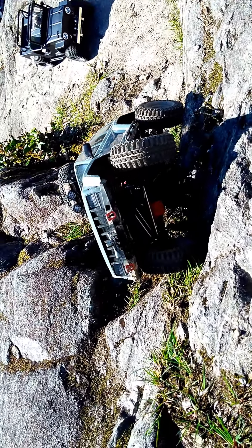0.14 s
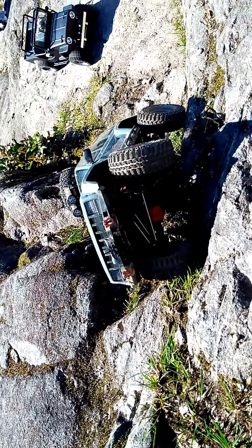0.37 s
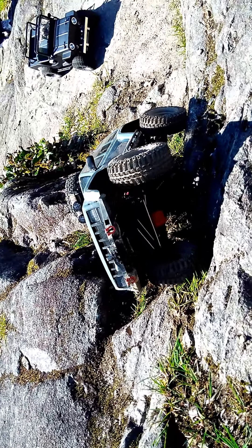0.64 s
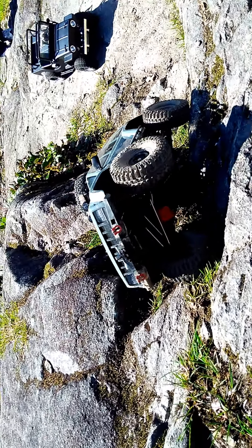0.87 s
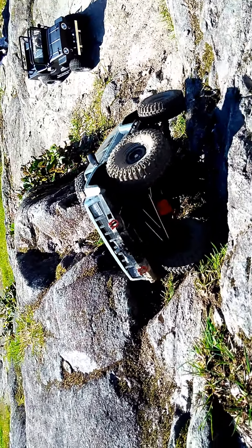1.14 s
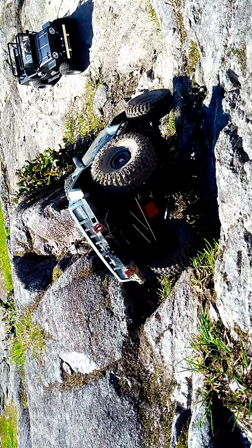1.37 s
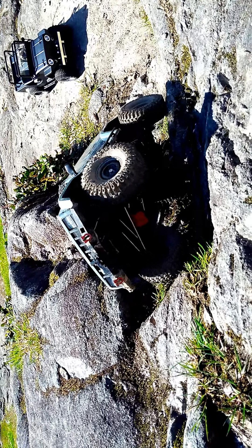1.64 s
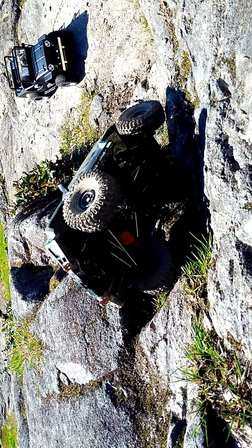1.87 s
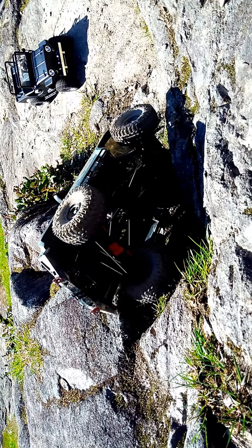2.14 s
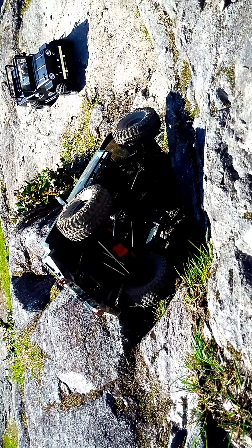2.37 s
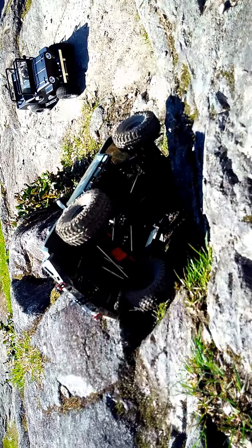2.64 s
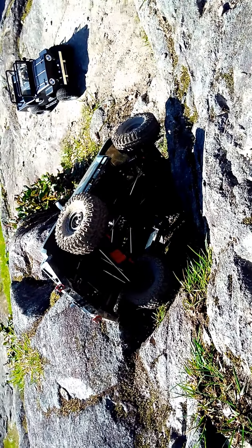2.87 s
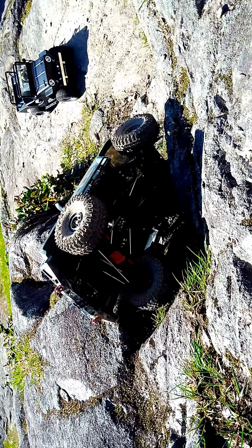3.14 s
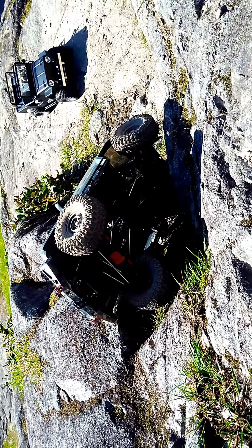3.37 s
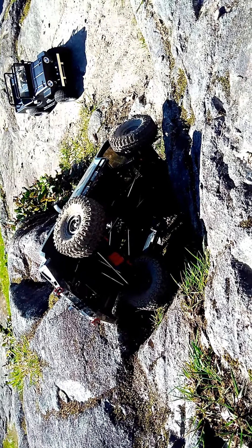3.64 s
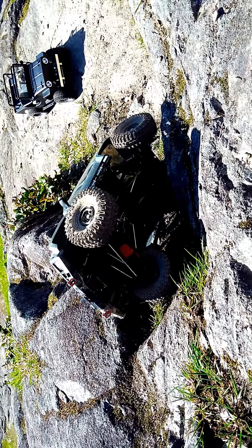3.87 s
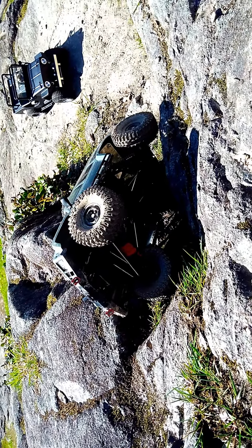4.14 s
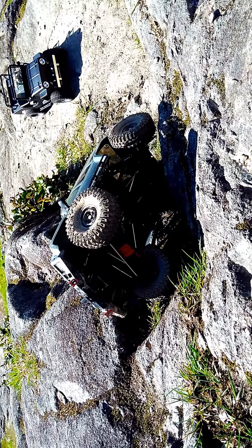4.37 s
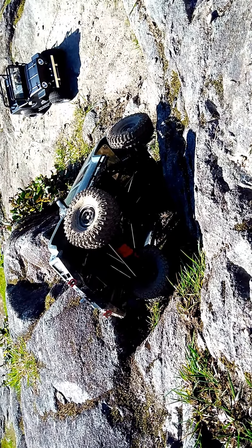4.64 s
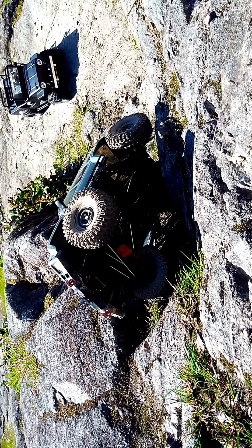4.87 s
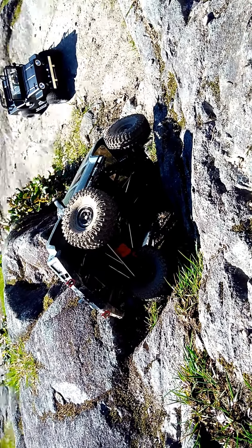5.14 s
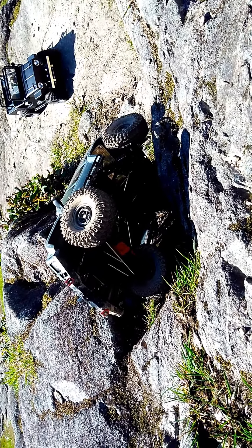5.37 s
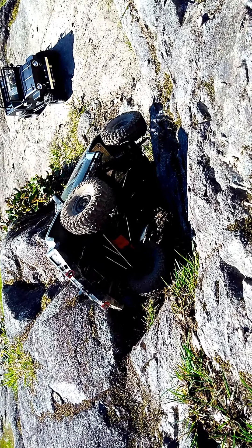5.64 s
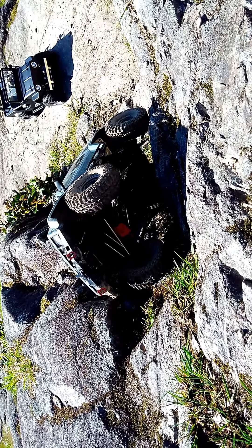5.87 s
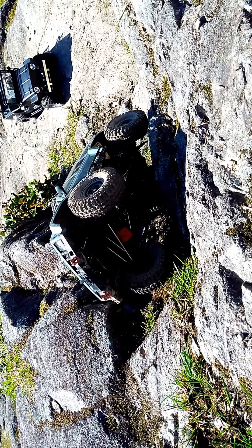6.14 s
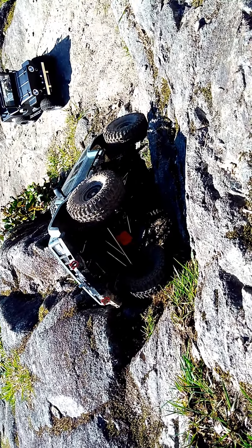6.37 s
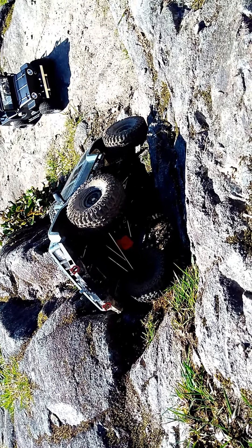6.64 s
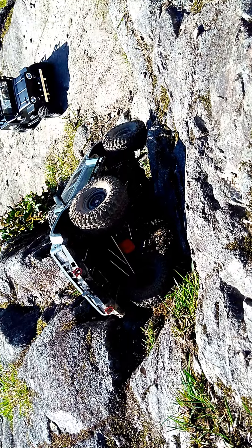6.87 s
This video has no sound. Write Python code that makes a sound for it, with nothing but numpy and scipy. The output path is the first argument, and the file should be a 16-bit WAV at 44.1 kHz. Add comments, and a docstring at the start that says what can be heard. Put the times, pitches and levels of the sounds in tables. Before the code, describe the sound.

Close up outdoors, a small toy truck whines with wavering plastic gears for about two seconds, hissing and knocking rock near the end. A quieter stretch follows with faint steering hum and a small rising tone. Then come two clusters of hard hollow knocks with short tyre grinding, and weak slow gear ticking between and after. Light wind bumps the stereo microphone; distant insects buzz faintly.

```python
"""Toy truck crawling over rocks

A toy truck's small gears whine with a wavering speed as a sum of partials, or as single tooth contacts at a crawl.
The tyres grind as random grains and stone knocks ring the chassis, both through a bank of plastic resonances.
Steering hums and hisses, and a faint tone glides up. A light breeze thumps on the microphone ports as low noise,
and insects buzz far off as a throbbing band of noise over open air and a far hum.
Two close microphone capsules are subtracted from each other to make the stereo pair."""
import sys
import numpy as np
from scipy import signal
from scipy.fft import rfft, irfft
from scipy.io import wavfile
from scipy.ndimage import uniform_filter1d

SR = 44100
rng = np.random.default_rng(int(sys.argv[2]) if len(sys.argv) > 2 else 0)


def master_out(mix):
    """Clip the mix to full scale and print it as 16-bit PCM to the path in sys.argv[1]."""
    frames = np.transpose(np.atleast_2d(mix))
    ceiling = np.clip(frames, -1, 1)
    pcm = np.round(ceiling * 32767).astype(np.int16)
    wavfile.write(sys.argv[1], SR, pcm)


def gain_from_db(level_db):
    """Turn a decibel level (scalar or array-like) into a linear amplitude factor."""
    decades = np.asarray(level_db, float) / 20
    return 10 ** decades


N = 308700
T = np.arange(N) / SR
HZ = np.maximum(np.fft.rfftfreq(N, 1 / SR), 1)


def rms_one(x):
    """Scales a sound to an rms (average strength) of 1."""
    return x / np.sqrt(np.mean(x ** 2) + 1e-20)


def in_time(rows, outside=None):
    """Draws straight lines between the rows of a table, one curve per column after the time."""
    s, *columns = np.transpose(rows)
    return [np.interp(T, s, column, outside, outside) for column in columns]


def at_hz(points, axis=1):
    """Reads one column of a spectrum table at every FFT frequency."""
    points = np.array(points)
    return np.interp(np.log(HZ), np.log(points[:, 0]), points[:, axis])


def noise():
    """Fresh white noise: equal strength at all pitches."""
    return rng.standard_normal(N)


def coloured(points):
    """Fresh noise shaped to a spectrum table, rms 1."""
    return rms_one(irfft(rfft(noise()) * gain_from_db(at_hz(points)), N))


def drift(rate_hz):
    """A slow random wander with rms 1, from smoothed noise drawn at every 20th sample."""
    r = np.exp(-40 * np.pi * rate_hz / SR)
    draws = rng.standard_normal(N // 20 + 2202)
    slow = signal.lfilter([1], [1, -2 * r, r * r], draws)[2200:]   # skip the filter's start
    return np.interp(np.arange(N) / 20, np.arange(len(slow)), rms_one(slow))


def resonate(x, hz, width_hz):
    """Lets one pitch ring: a two-pole resonance with gain close to 1 at its top."""
    r = np.exp(-np.pi * width_hz / SR)
    top = [(1 - r * r) / 2, 0, (r * r - 1) / 2]
    bottom = [1, -2 * r * np.cos(2 * np.pi * hz / SR), r * r]
    return signal.lfilter(top, bottom, x + 1e-18)


def soft(x, hz):
    """Softens a contact by low-passing its click."""
    r = np.exp(-2 * np.pi * hz / SR)
    return signal.lfilter([1 - r], [1, -r], x)


def evened(x, seconds):
    """Divides out the running level, so that another curve can set the loudness."""
    return x / np.sqrt(uniform_filter1d(x ** 2, int(seconds * SR)) + 1e-9)


def clicks(rows, db):
    """One single-sample push per event."""
    out = np.zeros(N)
    out[(np.array(rows)[:, 0] * SR).astype(int)] = gain_from_db(db)
    return out


def dying(x, t60):
    """Turns each push into a level that falls by 60 dB in t60 seconds."""
    return signal.lfilter([1], [1, -gain_from_db(-60 / (t60 * SR))], x)


def grains(per_s, spread_db):
    """Random clicks of uneven size and either sign, rms 1."""
    sizes = gain_from_db(spread_db * np.minimum(rng.exponential(1, N), 5)) * rng.choice([-1, 1], N)
    return rms_one(sizes * (rng.random(N) < per_s / SR))


def swells(rows, db, rise_s, t60):
    """Loudness curve in which each event rises, holds for its length and dies away."""
    out = np.zeros(N)
    for (start_s, length_s, *_), level_db in zip(rows, db):
        heard = slice(int(start_s * SR), int((start_s + rise_s + length_s + 2 * t60) * SR))
        t = T[heard] - start_s
        fall_db = 60 * np.maximum(t - rise_s - length_s, 0) / t60
        out[heard] += gain_from_db(level_db - fall_db) * np.clip(t / rise_s, 0, 1)
    return out


# resonances of the plastic chassis: pitch_hz, width_hz, level_db
CHASSIS_MODES = [(262.2, 37, 3), (482, 124, 2), (687.5, 148, 4.5), (995, 144, 5), (1303, 254, 2),
                 (1680, 434, 1), (1885, 595, 0), (2310, 780, -4), (3160, 160, -4), (3590, 770, -20),
                 (4960, 280, -42)]


def chassis(x, narrow=1):
    """Shakes the plastic chassis: all its resonances ring side by side, with alternating signs."""
    return sum((-1) ** k * gain_from_db(db) * resonate(x, hz, width * narrow)
               for k, (hz, width, db) in enumerate(CHASSIS_MODES))


# speed of the gears, before it trembles: time_s, contacts_per_s
GEAR_SPEED = [(0.0, 293), (0.021, 300), (0.042, 362), (0.056, 335), (0.087, 313), (0.114, 338), (0.15, 343),
              (0.207, 296), (0.245, 290), (0.278, 346), (0.293, 360), (0.344, 338), (0.359, 255),
              (0.407, 297), (0.464, 229), (0.506, 287), (0.536, 253), (0.564, 212), (0.58, 212),
              (0.596, 224), (0.632, 209), (0.656, 218), (0.694, 232), (0.727, 240), (0.742, 207),
              (0.776, 208), (0.798, 228), (0.83, 236), (0.855, 232), (0.89, 304), (0.914, 283),
              (0.938, 298), (0.961, 262), (1.0, 306), (1.022, 299), (1.07, 295), (1.1, 304), (1.112, 297),
              (1.148, 307), (1.171, 287), (1.195, 312), (1.224, 300), (1.248, 321), (1.284, 290),
              (1.306, 326), (1.344, 294), (1.366, 340), (1.39, 291), (1.412, 317), (1.445, 250),
              (1.473, 257), (1.503, 237), (1.54, 277), (1.58, 250), (1.62, 296), (1.645, 289), (1.668, 330),
              (1.708, 252), (1.745, 280), (1.8, 268), (1.838, 290), (1.91, 236), (1.967, 292), (1.987, 356),
              (2.008, 343), (2.026, 376), (2.045, 358), (2.07, 348), (2.089, 330), (2.125, 230), (2.2, 265),
              (3.68, 103), (3.8, 138), (3.94, 294), (4.1, 192), (4.97, 77), (5.015, 77), (5.03, 90),
              (5.07, 92), (5.11, 106), (5.165, 96), (5.168, 55), (5.18, 55), (5.184, 90), (5.255, 90),
              (5.262, 70), (5.33, 68), (5.42, 74), (6.5, 100), (6.55, 100), (6.57, 118), (6.69, 121),
              (6.75, 100), (6.85, 72)]
# moments when the gears take up their play on a tooth: start_s
CRAWL_STARTS = [0, 4.977, 6.505]


def gear_motion():
    """Adds up the gear speed into tooth contacts; a click marks each one."""
    mesh_hz, = in_time(GEAR_SPEED)
    fast = np.clip((mesh_hz - 150) / 50, 0, 1)   # 0 at a crawl, 1 at speed
    turns = np.cumsum(mesh_hz * (1 + .014 * drift(45))) / SR   # the speed trembles
    starts = (np.array(CRAWL_STARTS) * SR).astype(int)
    begun = starts[np.searchsorted(starts, np.arange(N), "right") - 1]
    contacts = np.diff(np.floor(turns - turns[begun]), prepend=0) > 0
    return fast, turns, contacts * gain_from_db(1.3 * drift(200))


# effort of the drive at the chassis, one table per pull: time_s, level_db
PULL_EFFORTS = [
    [(0.0, -29), (0.03, -26.5), (0.08, -28), (0.12, -23), (0.16, -26), (0.208, -31.5), (0.26, -29.5),
     (0.28, -20.5), (0.332, -23.5), (0.352, -29.5), (0.452, -34), (0.498, -28), (0.608, -37.5), (0.77, -33),
     (1.014, -27.5), (1.196, -28), (1.232, -29.5), (1.294, -27), (1.33, -24.5), (1.358, -23.5),
     (1.492, -34.5), (1.534, -28.5), (1.602, -31), (1.638, -27), (1.752, -29), (1.814, -29), (1.862, -43.5),
     (1.872, -37), (1.91, -37.5), (1.94, -28.5), (1.95, -31), (1.964, -25), (1.995, -19), (2.013, -23.5),
     (2.025, -16.5), (2.045, -25), (2.065, -20), (2.09, -27), (2.13, -31), (2.2, -39.5), (2.208, -29),
     (2.225, -29.5), (2.248, -42), (2.322, -67)],
    [(3.695, -61), (3.704, -47.5), (3.792, -42.5), (3.816, -35), (3.885, -37), (3.9, -28), (3.928, -27),
     (3.96, -29), (3.975, -33), (3.998, -33.5), (4.04, -43), (4.08, -55), (4.146, -66)],
    [(4.215, -63), (4.226, -45), (4.256, -47), (4.31, -50.5), (4.35, -59), (4.356, -45), (4.419, -55),
     (4.489, -86)],
    [(4.98, -63), (4.992, -55), (5.005, -46), (5.064, -49.5), (5.17, -46.5), (5.2, -48), (5.25, -45.5),
     (5.322, -40), (5.35, -71)],
    [(5.33, -67), (5.35, -47), (5.38, -56), (5.404, -48), (5.418, -61), (5.446, -51), (5.484, -68)],
    [(5.561, -41), (5.567, -27.5), (5.614, -33.5), (5.65, -35.5), (5.664, -40), (5.7, -40.5), (5.74, -37),
     (5.758, -32.5), (5.884, -41), (5.98, -53), (6.098, -56.5), (6.178, -82)],
    [(6.512, -62), (6.519, -50), (6.574, -43), (6.594, -46.5), (6.69, -43), (6.73, -70)],
    [(6.69, -52), (6.72, -47), (6.79, -53), (6.805, -42.5), (6.82, -46.5), (6.83, -57), (6.88, -70)],
]
# share of tyre grind in each pull, before judder and limits: share_0_to_1
PULL_GRIND = [0.02, 0.75, 0.8, 0.18, 0.8, 0.75, 0.25, 0.8]
# at speed the tyres judder under load, then break loose: time_s, added_grind_0_to_1
TYRE_JUDDER = [(0.0, 0), (0.34, 0), (0.37, .15), (0.54, .12), (0.66, .06), (0.7, .3), (0.74, 0),
               (0.85, .05), (1.0, .1), (1.38, .12), (1.44, .5), (1.54, .25), (1.8, .45), (1.83, .85),
               (1.94, .8), (1.97, .05), (2.07, .15), (2.1, 1)]


def load(fast):
    """Adds the pulls into one effort, and works out how much of it goes into grind."""
    efforts = [gain_from_db(in_time(pull, outside=-120)[0]) for pull in PULL_EFFORTS]
    effort = sum(efforts)
    rough = sum(share * part for share, part in zip(PULL_GRIND, efforts)) / effort
    rough = rough + fast * in_time(TYRE_JUDDER)[0]
    return effort, np.clip(.11 + .87 * rough, 0, 1)


# loudness of multiples 1 to 14 of the contact rate, before sharpness and drift: level_db
PARTIAL_LEVELS = [-1, 0.5, 0.5, 2.5, -3, -5, -5.5, -3.5, -17, -4, -7.5, -4.5, -5, -9]
# lightly loaded teeth touch more sharply; the tilt turns about the third multiple and
# stops growing at the fifth: time_s, tilt_db_per_multiple
TOOTH_SHARPNESS = [(0.0, 1.5), (0.35, 0), (0.45, 1), (0.56, 1.5), (0.85, 2.5), (0.95, -0.5), (1.4, 0.5),
                   (1.5, 1.5), (1.8, 2.5), (1.97, 0), (2.1, 1)]
# strain of a crawl, which rings the gearbox higher: time_s, level_db
CRAWL_STRAIN = [(5.0, -5), (5.05, -22), (5.16, -17), (5.19, -2), (5.34, 12), (5.4, -2), (6.5, -19),
                (6.6, -16), (6.68, 11), (6.72, -5)]


def gear_whine(fast, turns, teeth):
    """Rings the chassis with single contacts at a crawl, which merge into swelling partials at speed."""
    tilt_db, = in_time(TOOTH_SHARPNESS)
    partials = 0
    for k, db in enumerate(PARTIAL_LEVELS, 1):
        level = gain_from_db(3.8 * drift(30.0) + db + tilt_db * (min(k, 5) - 3))
        partials = partials + level * np.cos(2 * np.pi * (k * turns + rng.random()))
    # slow contacts are soft and reach only the gearbox band
    crawl = resonate(resonate(teeth, 730, 410), 770, 620)
    strained = resonate(teeth, 1050, 240) + gain_from_db(-15.0) * resonate(teeth, 2060, 500)
    crawl = crawl + gain_from_db(in_time(CRAWL_STRAIN)[0]) * strained
    at_speed = evened(chassis(partials), seconds=0.057)
    at_crawl = evened(chassis(crawl, narrow=0.62), seconds=0.036)
    return fast * at_speed + (1 - fast) * at_crawl


def grind():
    """Tyres and gears grind: many soft, uneven grains shake the chassis."""
    return evened(chassis(soft(grains(900, spread_db=1.0), 1260)), seconds=0.073)


def whistle():
    """A thin steady whistle: noise through one very narrow resonance."""
    return rms_one(resonate(noise(), 3900, 32))


# the body lurches on its springs: start_s, length_s, level_db
BODY_LURCHES = [(0.039, 0.011, -39), (0.18, 0.0067, -57), (0.434, 0.013, -39.5), (0.982, 0.02, -49),
                (1.542, 0.015, -52), (1.736, 0.084, -36), (1.954, 0.028, -61), (2.062, 0.02, -27.5),
                (2.211, 0.024, -34.5), (2.952, 0.086, -51.5), (3.813, 0.029, -29.5), (3.882, 0.11, -29.5),
                (4.218, 0.042, -44), (4.373, 0.017, -49), (5.555, 0.013, -30.5), (5.638, 0.023, -36.5),
                (6.675, 0.019, -49), (6.797, 0.009, -47.5)]


def shudder(effort):
    """Low resonant noise of the body on its springs, with lurches, effort and a steady floor."""
    level = swells(BODY_LURCHES, np.array(BODY_LURCHES)[:, 2], rise_s=0.0059, t60=0.28)
    level = level + gain_from_db(-28 + 6.4 * drift(6.3)) * effort + gain_from_db(-63)
    rumble = resonate(resonate(noise(), 247.5, 61), 166.0, 480)
    return level * evened(rumble, seconds=0.0315)


# shape of the hiss noise: pitch_hz, level_db (per Hz)
HISS_COLOUR = [(1200, -16.5), (2000, 5.5), (3200, 6.5), (4500, 1), (6000, -4.5), (7500, -17.5), (9000, -24),
               (15000, -52)]
# shape of the finest grit and brush sparks: pitch_hz, level_db (per Hz)
FIZZ_COLOUR = [(5000, -6), (7000, -4.5), (9000, 4.5), (12000, 1), (15300, -4), (15700, -37)]
# tyres and skid plate scrape the rock: start_s, length_s, level_db, brightness_db
ROCK_SCRAPES = [(0.267, 0.032, -72, -6), (1.34, 0.014, -51, -27), (1.967, 0.017, -35, -5.5),
                (1.995, 0.018, -35, -40), (2.11, 0.015, -46, -30), (2.134, 0.032, -47, -6),
                (2.245, 0.051, -58, -8), (2.33, 0.14, -74, -15), (3.797, 0.0077, -57, -21),
                (3.923, 0.028, -49, -34), (5.547, 0.016, -45, -5), (5.609, 0.072, -47, -6.5),
                (5.671, 0.042, -56.5, 3), (5.758, 0.082, -53, -5), (6.68, 0.13, -84, 14.5)]
# the steering works: start_s, length_s, hum_db, hiss_db
STEERING = [(2.687, 0.017, -68, -60.5), (2.719, 0.069, -60, -53), (2.791, 0.0072, -58, -53.5),
            (2.833, 0.0062, -56.5, -54.5), (2.86, 0.0084, -51.5, -52.5), (2.944, 0.092, -63.5, -73),
            (3.198, 0.071, -64.5, -80)]
STEERING_RISE_S, STEERING_T60_S = 0.0087, 0.12


def brush_and_grit_hiss(effort, rough, fast, turns):
    """Brushes, grit, scrapes and steering hiss as two noises that pulse with each tooth contact."""
    scrape_db, bright_db = np.array(ROCK_SCRAPES)[:, 2:].T
    scrape = swells(ROCK_SCRAPES, scrape_db, rise_s=0.029, t60=0.14)
    bright_scrape = swells(ROCK_SCRAPES, scrape_db + bright_db, rise_s=0.029, t60=0.14)
    steer = swells(STEERING, np.array(STEERING)[:, 3], STEERING_RISE_S, STEERING_T60_S)
    hiss = gain_from_db(-19.5) * effort * fast + gain_from_db(3 * drift(83)) * scrape + steer + gain_from_db(-67.5)
    fizz = gain_from_db(-25.5) * effort * fast + bright_scrape + gain_from_db(-1.5) * steer
    flicker = gain_from_db(2.0 * drift(54)) * (1 + .7 * (1 - rough) * np.cos(2 * np.pi * turns))
    return [flicker * (hiss * coloured(HISS_COLOUR) + fizz * coloured(FIZZ_COLOUR)) for capsule in range(2)]


def drive():
    """Tooth contacts and the grind of tyres and gears shake the chassis; brushes and grit hiss."""
    fast, turns, teeth = gear_motion()
    effort, rough = load(fast)
    grinding = grind()
    whine = gear_whine(fast, turns, teeth)
    body = effort * (np.sqrt(1 - rough) * whine + np.sqrt(rough) * grinding)
    body = body + gain_from_db(-76.5 + 2.7 * drift(24.0)) * grinding   # a faint rattle throughout
    body = body + gain_from_db(-42) * effort * fast * whistle()
    return body + shudder(effort), brush_and_grit_hiss(effort, rough, fast, turns)


# the chassis strikes stone; pitch is that of the struck part: start_s, level_db, sharpness_db, pitch_hz
STONE_KNOCKS = [(1.873, -20, -33, 1000), (1.948, -19, -41, 1150), (2.207, -24.5, -10, 1022),
                (3.805, -23, -61, 1181), (3.816, -17.5, -23, 800), (3.8917, -9.5, -15, 1000),
                (3.91, -17, -47, 800), (3.937, -18.5, -21, 1100), (3.968, -18, -27, 1100),
                (3.987, -25, -31, 700), (4.153, -38.5, -32, 723.5), (4.224, -23, -56, 560),
                (4.355, -33, -53, 640), (5.179, -32.5, -49, 1050), (5.563, -7, -30, 710),
                (5.582, -14, -41, 800), (5.596, -28, -42, 900), (5.658, -21.5, -25, 719.4),
                (5.704, -18, -33, 1400), (5.747, -20.5, -40, 771), (5.775, -18.5, -30, 543),
                (5.9863, -22.5, -25, 880), (6, -11, -69, 630), (6.0125, -14.5, -15.5, 1050),
                (6.803, -33.5, -46, 993)]
# a hard edge gives one sharp push, centred on its time: time_s, level_db, pitch_hz
HARD_SNAPS = [(1.873, -24, 1100), (1.948, -18, 1170), (2.2082, -21, 1100), (3.8903, -11.5, 1330),
              (4.356, -32.5, 780), (5.18, -30, 1100), (5.5648, -9.5, 930), (5.66, -17.5, 716),
              (5.707, -24, 1290), (5.749, -14.5, 910), (5.987, -24, 865), (6.0137, -3, 1220)]
# ticks of grit: start_s, level_db
GRIT_TICKS = [(0.4126, -39.5), (0.932, -35.5), (2.303, -49), (2.5276, -58), (2.9505, -47.5), (3.221, -54),
              (3.581, -48.5), (3.931, -38), (5.821, -45), (5.9042, -46.5)]


def knocks():
    """A blow snaps, rings the modes nearest the struck part, rattles them and cracks in the treble."""
    level_db, sharp_db, struck_hz = np.array(STONE_KNOCKS)[:, 1:].T
    # dull blows hardly snap
    snap = resonate(clicks(STONE_KNOCKS, level_db + .5 * sharp_db), 1450, 560)
    grit = grains(2500, spread_db=-6.5)
    ring = 0
    for k, (hz, width, db) in enumerate(CHASSIS_MODES):
        octaves_away = np.abs(np.log2(hz / struck_hz))
        blow = clicks(STONE_KNOCKS, level_db + db - 3.6 * octaves_away)
        rattle = dying(blow, 0.088) * grit
        ring = ring + (-1) ** k * resonate(gain_from_db(15.5) * blow + gain_from_db(2) * rattle, hz, 0.74 * width)
    for s, db, hz in HARD_SNAPS:
        near = slice(int(s * SR) - 300, int(s * SR) + 300)
        cycles = hz * (T[near] - s)
        ring[near] += gain_from_db(db) * np.cos(2 * np.pi * cycles) * np.exp(-(cycles / 0.51) ** 2)
    crack = dying(clicks(STONE_KNOCKS, level_db + sharp_db), 0.045)
    tick = dying(clicks(GRIT_TICKS, np.array(GRIT_TICKS)[:, 1]), 0.016)
    hiss, fizz = gain_from_db(4.0) * (crack + tick), 0.039 * crack + 1.23 * tick
    treble = [hiss * coloured(HISS_COLOUR) + fizz * coloured(FIZZ_COLOUR) for capsule in range(2)]
    return gain_from_db(29.5) * snap + ring, treble


# resonances of the steering: pitch_hz, width_hz, level_db
STEERING_MODES = [(640, 82, -4), (1220, 91, -0.5), (1560, 75, -21)]


def steering_hum():
    """The steering hums roughly: random grains ring a few resonances."""
    hum = sum(gain_from_db(db) * rms_one(resonate(grains(3000, spread_db=4.0), hz, width))
              for hz, width, db in STEERING_MODES)
    return swells(STEERING, np.array(STEERING)[:, 2], STEERING_RISE_S, STEERING_T60_S) * hum


def gliding_tone():
    """A faint sine holds with its octave, then glides up."""
    hold_s, glide_start_s, glide_s = .12, 3.09, 0.15
    # the pitch climbs a little longer, while the tone dies away
    hz = 215 + 850 * np.clip(T - glide_start_s, 0, glide_s + 0.036)
    angle = 2 * np.pi * np.cumsum(hz) / SR
    start_s = glide_start_s - hold_s
    tone = swells([(start_s, hold_s + glide_s)], [-52], rise_s=0.03, t60=0.16)
    octave = swells([(start_s, hold_s)], [-59], rise_s=0.02, t60=0.2)
    tone = tone * gain_from_db(2.5 * drift(30)) * np.sin(angle)
    return tone + octave * gain_from_db(2.5 * drift(30)) * np.sin(2 * angle)


# far capsule against near one, for the truck: pitch_hz, level_db, unrelated_share_0_to_1, phase_lag_rad
FAR_CAPSULE = [(107.3, 15, 0, 0.01), (240, -3.5, 0, 0.48), (650, 0.5, 0.1, 0.29), (1200, 4, 0.18, 1.5),
               (1360, 1.5, 0.34, 2), (1840, 7.5, 0.2, 1.95), (2150, -4, 1, 1.75), (2570, -1, 1, 2.9),
               (5900, 2, 0.91, 1.7), (12200, 1, 1, 2.4)]


def to_capsules(x, hiss):
    """The far capsule hears the truck later, shadowed and partly by other paths."""
    scatter = rng.standard_normal(300) * np.exp(-np.arange(300) / 70)
    scattered = signal.fftconvolve(x, scatter / np.linalg.norm(scatter))[:N]
    other = rfft(scattered + hiss[1])
    near = x + hiss[0]
    direct = rfft(near) * np.exp(-1j * at_hz(FAR_CAPSULE, axis=3))
    share = np.clip(at_hz(FAR_CAPSULE, axis=2), 0, 1)
    far = gain_from_db(at_hz(FAR_CAPSULE)) * (np.sqrt(1 - share) * direct + np.sqrt(share) * other)
    return np.array([near, irfft(far, N)])


# strength of the breeze, before its lumps: time_s, level_db
BREEZE_LEVEL = [(0.0, -46.5), (1.3, -60.5), (2.0, -47.5), (4.0, -55), (4.5, -53.5), (5.5, -50),
                (6.0, -48.5), (6.5, -86), (7.0, -44)]
# thumps on the ports, before they are shared between the two: time_s, level_db
PORT_THUMPS = [(2.271, -24), (2.313, -18), (2.455, -19), (2.616, -23), (2.826, -24), (2.973, -17),
               (4.962, -25), (5.141, -19.5), (5.617, -10), (5.675, -24), (5.722, -21), (6.788, -22),
               (6.848, -14.5)]


def wind():
    """Lumpy low noise, own on each port, and single thumps that push one port more."""
    level = gain_from_db(in_time(BREEZE_LEVEL)[0])
    low = signal.butter(2, [45, 170], "band", fs=SR, output="sos")
    lumps = [level * gain_from_db(5.9 * np.minimum(drift(21.4), 2)) * rms_one(signal.sosfilt(low, noise()))
             for port in range(2)]
    t = np.arange(-900, 900) / SR
    puff = np.sin(2 * np.pi * 95 * t) * np.exp(-(t / 0.0044) ** 2)
    thumps = signal.fftconvolve(clicks(PORT_THUMPS, np.array(PORT_THUMPS)[:, 1]), puff, "same")
    return np.array(lumps) + thumps * [[.7], [-.3]]   # opposite pushes


# loudness of the insects, before it wanders: time_s, level_db
INSECT_LEVEL = [(0.0, -64.5), (2.5, -77.5), (2.9, -75), (3.1, -74), (3.25, -72.5), (3.9, -68),
                (4.15, -77.5), (4.6, -82), (5.1, -78), (5.3, -75.5), (5.67, -60), (6.0, -73), (6.25, -78),
                (6.5, -85), (6.75, -73.5), (7.0, -84)]


def insects():
    """Insects buzz as a narrow band of noise, throbbing about 31 times a second."""
    throb = 1 + 0.5 * np.sin(2 * np.pi * np.cumsum(31.0 * (1 + 0.034 * drift(3.34))) / SR)
    buzz = rms_one(resonate(resonate(noise(), 8560, 450), 8560, 1100)) * throb
    return gain_from_db(in_time(INSECT_LEVEL)[0] + 3.0 * drift(4.8)) * buzz


# shape of the open air noise: pitch_hz, level_db (per Hz)
AIR_COLOUR = [(60, -1), (120, -2), (250, -8), (500, -12), (1000, -20), (2000, -25.5), (4000, -45),
              (7000, -39.5), (10000, -30), (15000, -75)]
# a far hum that wavers: pitch_hz, width_hz, level_db
FAR_HUM = [(117, 10.6, -55), (232, 8.7, -68.5)]


def outdoors():
    """Air noise partly shared by the capsules, a far wavering hum, and insects straight ahead."""
    shared = coloured(AIR_COLOUR)
    air = gain_from_db(-49.5) * np.array([0.15 * shared + 0.58 * coloured(AIR_COLOUR) for capsule in range(2)])
    hum = sum(gain_from_db(db) * rms_one(resonate(noise(), hz, width)) for hz, width, db in FAR_HUM)
    return air + hum * [[1], [0.6]] + insects()


def scene():
    """Adds up the air pressure at the two capsules."""
    body, hiss = drive()
    blows, cracks = knocks()
    truck = body + blows + gliding_tone() + steering_hum()
    return to_capsules(truck, np.add(hiss, cracks)) + wind() + outdoors()


def roll_off(x):
    """The treble ends steeply here."""
    return signal.sosfilt(signal.butter(12, 16060, fs=SR, output="sos"), x)


# the cross path from one capsule to the other side: pitch_hz, delay_cycles, gain_0_to_1
CROSS_PATH = [(0, 0, .92), (1170, .5, .9), (2540, 1, .93), (3790, 1.5, .9), (4960, 2, .75),
              (6370, 2.5, .85), (7580, 3, .95), (8620, 3.5, .6), (10400, 4, .6), (11800, 4.5, .8),
              (13000, 5, .93), (14200, 5.5, .93), (15650, 6, .95)]


def record(dry):
    """Each side is one capsule minus the other delayed; centre bass is lifted and faint hiss added."""
    preamp_high = signal.butter(2, 3870, "high", fs=SR, output="sos")
    capsule_hiss, preamp_hiss = signal.sosfilt(preamp_high, rng.standard_normal((2, 2, N)))
    both = rfft(dry + gain_from_db(-70) * capsule_hiss)
    hz, cycles, gain = np.transpose(CROSS_PATH)
    delay = np.exp(-2j * np.pi * np.interp(HZ, hz, cycles))
    # the subtraction combs sum and difference and thins the centre bass
    sides = both - np.interp(HZ, hz, gain) * delay * both[::-1]
    centre_bass = sides.mean(axis=0) * gain_from_db(11) / (1 + 1j * HZ / 90)
    sides = irfft(sides + centre_bass, N) + gain_from_db(-67) * preamp_hiss
    sides = signal.sosfilt(signal.butter(3, 62, "high", fs=SR, output="sos"), sides)
    sides = signal.sosfilt(signal.cheby2(22, 50, 15900, fs=SR, output="sos"), sides)   # steep treble limit
    return roll_off(np.clip(sides, -1, 1))


dry = scene()
out = record(dry)
master_out(out)
```